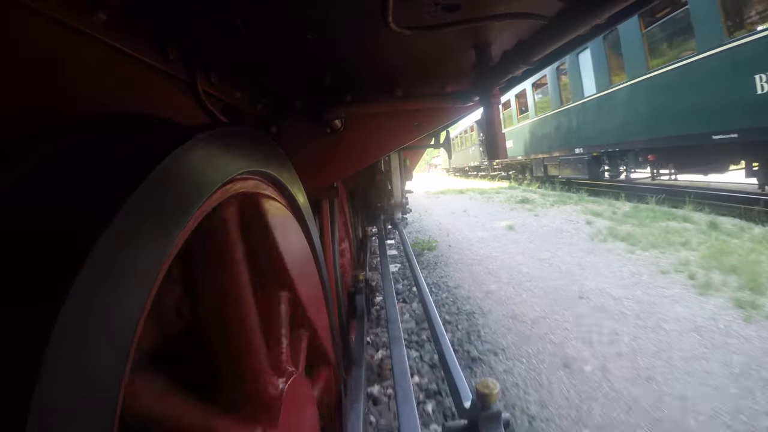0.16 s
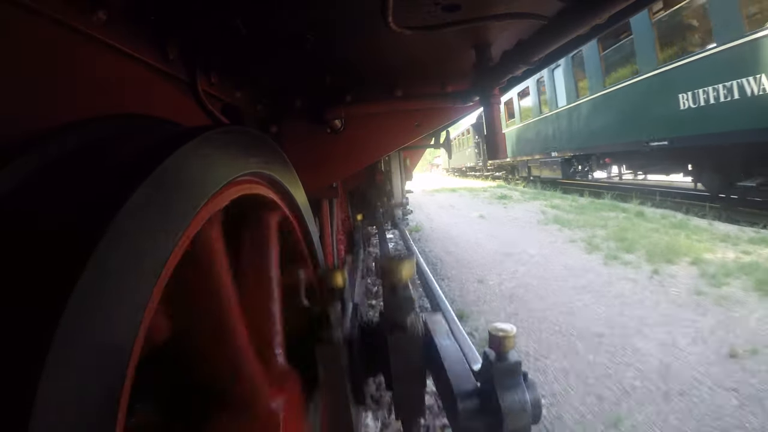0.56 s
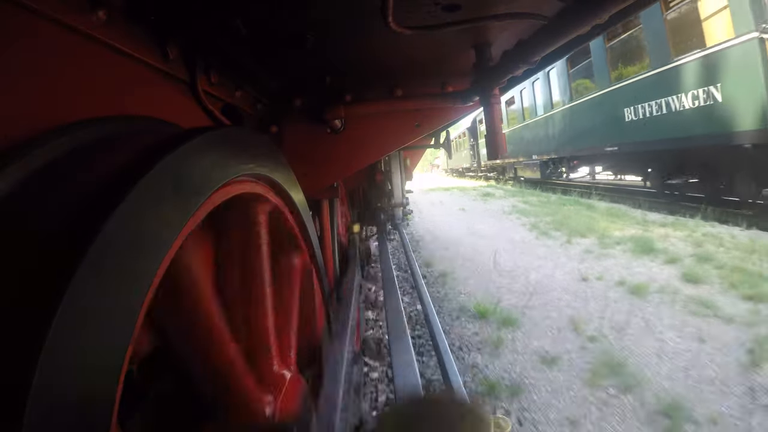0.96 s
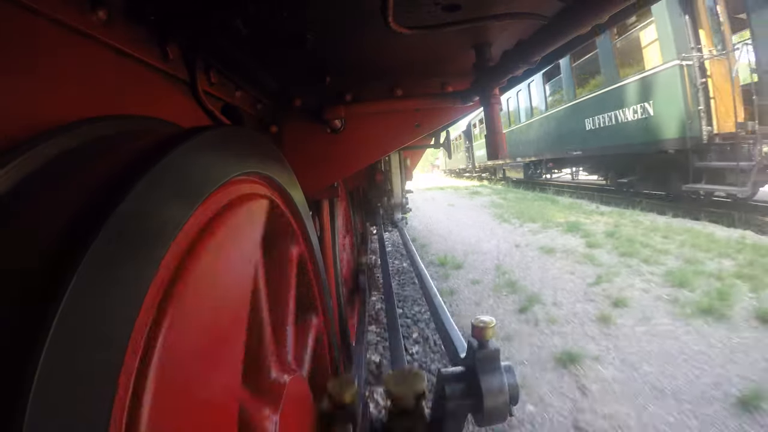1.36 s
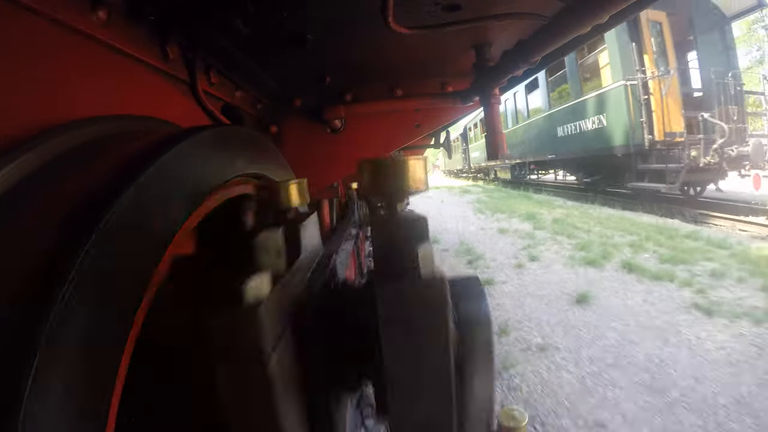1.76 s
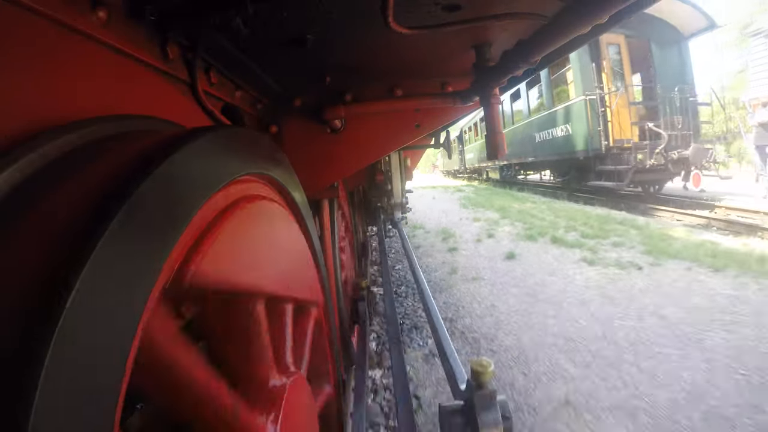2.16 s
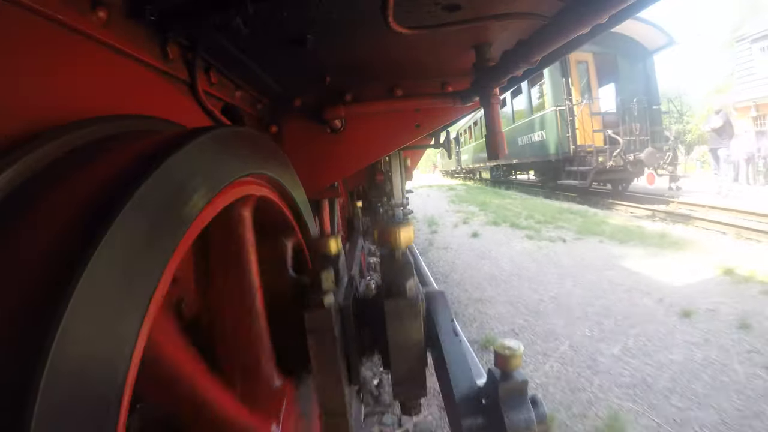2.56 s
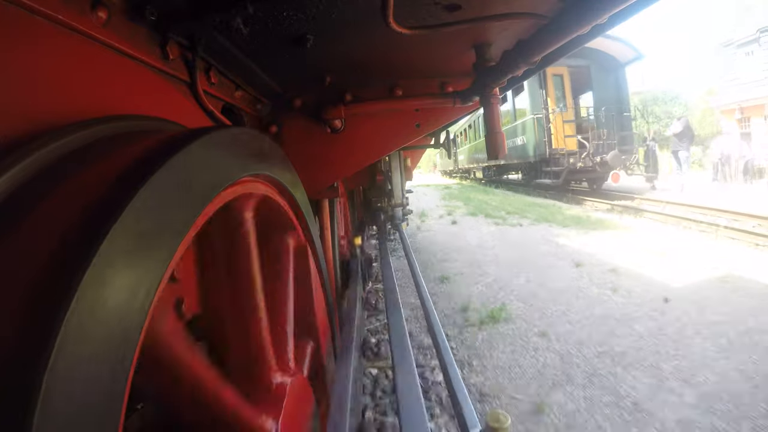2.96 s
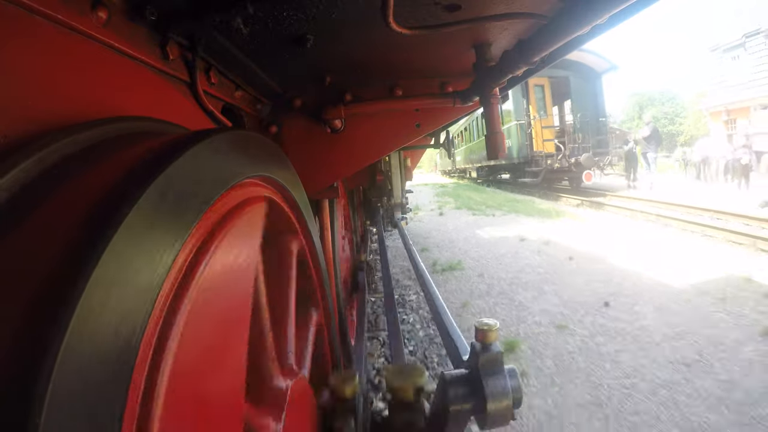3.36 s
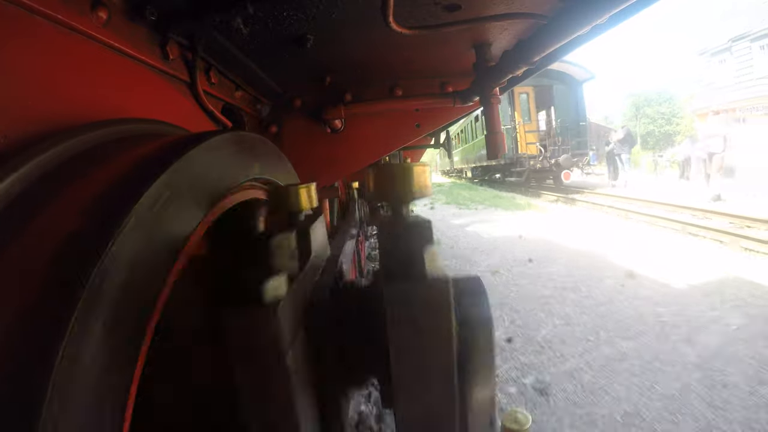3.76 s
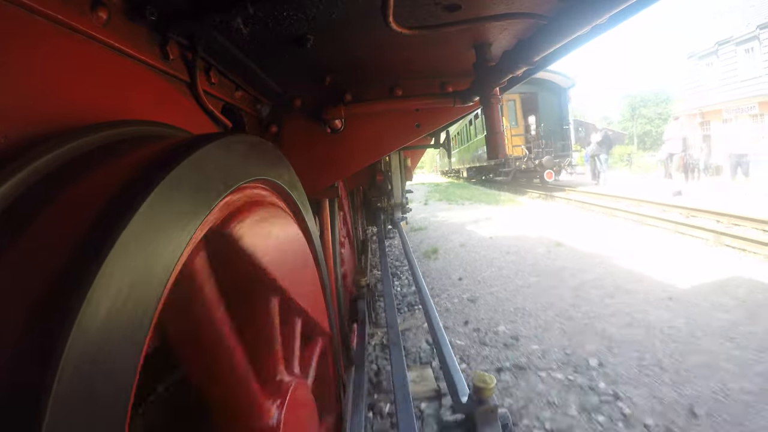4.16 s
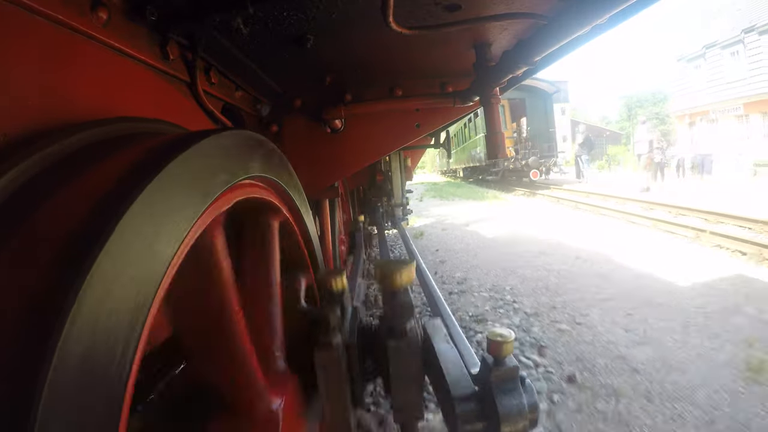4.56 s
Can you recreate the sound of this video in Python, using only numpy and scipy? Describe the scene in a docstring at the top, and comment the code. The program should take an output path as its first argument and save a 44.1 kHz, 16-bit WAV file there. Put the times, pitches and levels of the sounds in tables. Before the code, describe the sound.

Beside a locomotive's driving wheels: low surging frame drone, ringing steel clinks and rattles, then a violent knock, more thuds and brief quiet hisses.

```python
"""In a station, on the frame of a slowly rolling steam locomotive, beside the driving wheels.
Rolling wheels keep frame, plates, panel and cover booming: shaken resonances, noise and wavering tones.
Play in rods and axle boxes clinks, ticks, rattles and knocks: noise bursts ring the modes of the steel.
Steam escapes in three short hisses: gated noise, shaped by a jet spectrum and the leak's resonances."""
import sys
import numpy as np
from scipy import signal
from scipy.fft import rfft, irfft, next_fast_len
from scipy.io import wavfile
from scipy.ndimage import uniform_filter1d, minimum_filter1d, map_coordinates

SR = 44100
rng = np.random.default_rng(int(sys.argv[2]) if len(sys.argv) > 2 else 0)


def wrap_up_sound(samples):
    """Save the sound to the file named by the first command line argument, as 16-bit audio."""
    columns = np.atleast_2d(samples).T
    # keep every value between -1 and 1, then stretch to whole-number steps
    tamed = np.clip(columns, -1, 1)
    steps = np.round(tamed * 32767).astype(np.int16)
    wavfile.write(sys.argv[1], SR, steps)


N = 207975  # samples


def amp(db):
    """Decibels to gain."""
    return 10 ** (np.asarray(db) / 20)


def unit(x):
    """x at rms 1."""
    return x / np.sqrt(np.mean(x ** 2) + 1e-20)


def curves(rows):
    """One value per sample for each column after the time, interpolated linearly."""
    s, *cols = np.transpose(rows)
    return [np.interp(np.arange(N) / SR, s, c) for c in cols]


def wobble(knots_per_s):
    """A smooth random curve through normally distributed knots."""
    knots = rng.standard_normal(int(N * knots_per_s / SR) + 4)
    return map_coordinates(knots, [np.arange(N) * knots_per_s / SR])


def swells(rows):
    """A gain that rises and falls in one arch for each (start s, length s, dB) row."""
    t = np.arange(N) / SR
    return sum(amp(db) * np.sin(np.pi * np.clip((t - start_s) / length_s, 0, 1))
               for start_s, length_s, db in rows)


def filtered(x, response):
    """x times a complex response of frequency."""
    m = next_fast_len(len(x) + SR // 2)
    return irfft(rfft(x, m) * response(np.fft.rfftfreq(m, 1 / SR)), m)[:len(x)]


def resonate(x, modes):
    """x through a body's modes; little passes below the lowest or above the highest."""
    def body(f):
        total = 0
        for k, (hz, width_hz, db) in enumerate(modes):
            damping = 1j * f * width_hz
            total = total + (-1) ** k * amp(db) * damping / (hz * hz - f * f + damping)
        return total

    edges_hz = [modes[0][0] * .72, min(modes[-1][0] * 1.3, .45 * SR)]
    band = signal.butter(2, edges_hz, 'bandpass', fs=SR, output='sos')
    return signal.sosfilt(band, filtered(x, body))


def rush(spectrum):
    """Noise of rms 1 with a (Hz, dB) spectrum."""
    hz, db = np.transpose(spectrum)
    noise = rng.standard_normal(N)
    return unit(filtered(noise, lambda f: amp(np.interp(np.log(f + 1), np.log(hz), db))))


def shaken(modes, even_s):
    """Modes under steady random shaking, at rms 1 over every stretch of even_s."""
    x = resonate(rng.standard_normal(N + SR), modes)[SR:]  # skips the onset
    power = np.abs(uniform_filter1d(x * x, max(int(even_s * SR), 1)))
    return x / np.sqrt(power + 1e-20)


def tone(hz, waver_hz, waver_db):
    """One lightly damped mode near rms 1 that wavers in pitch and strength."""
    phase = 2 * np.pi * np.cumsum(hz + waver_hz * wobble(14)) / SR
    return np.sqrt(2) * amp(waver_db * wobble(12)) * np.sin(phase)


def blow(modes, attack_s, t60_s, tail_db, tail_t60_s, strike=0):
    """A rough contact of peak 1: a strike, a burst of tiny impacts and a weaker chatter ring the modes."""
    t = np.arange(SR // 4) / SR
    decay = amp(-60 * t / t60_s) + amp(tail_db - 60 * t / tail_t60_s)
    envelope = (1 - np.exp(-t / attack_s)) * decay
    force = envelope * rng.standard_normal(len(t)) / np.linalg.norm(envelope)
    force[0] += strike
    x = resonate(force, modes)
    return x / np.abs(x).max()


def add(track, s, x):
    """Mix x into the track from time s."""
    part = track[round(s * SR):][:len(x)]
    part += x[:len(part)]


# Slow surges of the frame's main mode. Each row: time in seconds, level in dB before DRONE_TRIM_DB.
DRONE_SURGES = [(0, -10), (0.22, -23), (0.35, -15), (0.47, -21.5), (0.6, -6.5), (0.75, -23.5),
                (0.95, -13.5), (1.3, -9), (1.75, -17), (1.87, -16), (2.1, -16.5), (2.7, -7.5), (3.1, -24),
                (3.28, -7.5), (3.46, -14), (3.6, -11.0), (4.35, -8.5), (4.72, -13.5)]
DRONE_HZ, DRONE_TRIM_DB = 74.1, -3.5


def drone():
    """The frame swings in its strongest mode, near one pitch, and surges slowly."""
    level_db, = curves(DRONE_SURGES)
    return amp(level_db + DRONE_TRIM_DB) * tone(DRONE_HZ, waver_hz=1.18, waver_db=1.8)


# Rail roughness as roar level. Each row: time in seconds, level in dB (only its deviation from the mean acts).
RAIL_ROUGHNESS = [(0.0, -38.5), (1.22, -40), (1.35, -40), (1.61, -39.5), (1.85, -38.5), (2.01, -35),
                  (2.14, -33), (2.35, -37.5), (3.53, -38), (3.94, -37.5), (4.5, -39), (4.72, -34.5)]


def roughness():
    """How much rougher than average the rail is, in dB."""
    rail_db, = curves(RAIL_ROUGHNESS)
    return rail_db - rail_db.mean()


# Modes of deep chassis, frame, plates and wheel.
# Each row: frequency in Hz, width in Hz, relative level in dB.
BOOM_MODES = [(31.8, 6.2, -24.5), (49.25, 2.8, -8.5), (55.46, 2.1, -5), (61.8, 4.9, -3)]
FRAME_MODES = [(104.7, 7.9, 0), (112.2, 5.4, 1.5), (120.4, 20, -10), (149.1, 8.2, -3.5), (159.7, 10, -9),
               (200.3, 25, -14)]
PLATE_MODES = [(272.9, 15.5, 5.5), (291.7, 9.1, 3), (309.7, 16.5, 2), (318.7, 11.25, 4.5),
               (359.8, 13.5, -5), (400, 3.1, -11.5)]
WHEEL_MODES = [(547, 8.9, 6), (554.6, 55, 0), (612.7, 25, 2), (661.3, 21, -1.5), (735, 38, -10.5),
               (800, 32, -18), (1003, 20, -3.5), (1013, 74, -13), (1127.5, 46, -15.5), (1334, 63, -23),
               (1557, 65, -30.5), (1720, 44, -23.5), (2310, 160, -41), (2510, 28, -31.5)]
# Ground grit. Each row: frequency in Hz, relative spectral level in dB per Hz.
GRIT_SPECTRUM = [(400, -11), (800, 12.5), (1400, 10), (2100, -1), (2700, 4), (3200, 7.5), (3700, 0.5),
                 (4500, 2), (5400, -1), (6200, 5.5), (7000, -3.5), (9000, 1), (11000, -6), (14000, -27)]
# Chassis rumble. Each row: time in seconds, deep boom level in dB, frame level in dB, both before trim.
RUMBLE_LEVELS = [(0, -17, -23.5), (0.35, -9, -13.0), (0.65, -16.5, -19), (0.95, -10.0, -20.5),
                 (1.25, -18, -18.5), (1.6, -9.5, -17.5), (2.1, -11.5, -14.5), (2.4, -10.5, -20.5),
                 (2.65, -14, -23), (2.9, -15.5, -15), (3.3, -14.5, -19.5), (3.55, -11.5, -26.5),
                 (3.8, -16, -18.5), (4.05, -14, -20.5), (4.35, -18.5, -20.5), (4.72, -9.5, -27)]
# Booming plates. Each row: time in seconds, level in dB before trim.
PLATE_LEVELS = [(0, -21.0), (0.9, -20), (1.2, -21), (1.45, -24.5), (1.65, -18.5), (1.85, -20.5),
                (2.25, -16.5), (2.65, -22.5), (3.0, -21.5), (3.45, -18), (4.2, -20.5), (4.4, -17.5),
                (4.72, -21)]
# Plates boom under heavy jolts. Each row: start in seconds, length in seconds, peak level in dB.
PLATE_JOLTS = [(.89, 0.043, -21.5), (2.72, .06, -11), (4.37, 0.039, -12.5), (4.48, 0.055, -12),
               (4.655, 0.084, -8.5)]
BOOM_TRIM_DB, FRAME_TRIM_DB, PLATES_TRIM_DB = -3, -2, -0.5
ROAR_DB, GRIT_DB = -38, -64  # on average rail; grit at mid-scene
ROAR_DB_PER_ROUGH_DB, GRIT_DB_PER_ROUGH_DB = 1, 0.55
GRIT_RISE_DB_PER_S = 1


def rolling():
    """Steel treads shake the chassis, ring the wheels and grind up grit, all the more on rough rail."""
    t = np.arange(N) / SR
    rough_db = roughness()
    boom_db, frame_db = curves(RUMBLE_LEVELS)
    plates_db, = curves(PLATE_LEVELS)
    boom = amp(boom_db + BOOM_TRIM_DB) * shaken(BOOM_MODES, even_s=.2)
    frame = amp(frame_db + FRAME_TRIM_DB) * shaken(FRAME_MODES, even_s=0.12)

    plates_gain = amp(plates_db + PLATES_TRIM_DB + 1.7 * wobble(12))
    plates = np.hypot(plates_gain, swells(PLATE_JOLTS)) * shaken(PLATE_MODES, even_s=0.16)

    roar_db = ROAR_DB + ROAR_DB_PER_ROUGH_DB * rough_db + 1.9 * wobble(22)
    roar = amp(roar_db) * shaken(WHEEL_MODES, even_s=0.9)

    rise_db = GRIT_RISE_DB_PER_S * (t - t.mean())
    grit_db = GRIT_DB + GRIT_DB_PER_ROUGH_DB * rough_db + rise_db + 1.5 * wobble(48)
    grit = amp(grit_db) * rush(GRIT_SPECTRUM)
    return boom + frame + plates + roar + grit


# Panel swells. Each row: start in seconds, length in seconds, peak level in dB.
PANEL_SWELL_ROWS = [(0.025, 0.033, -13.5), (0.365, 0.06, -18.5), (0.457, 0.065, -12.5), (0.651, 0.021, -13),
                    (0.707, 0.14, -17), (0.877, 0.06, -13.5), (1.155, 0.17, -14), (1.434, 0.057, -19.5),
                    (1.755, 0.086, -14), (2.057, 0.095, -17), (2.446, 0.056, -18), (2.524, 0.048, -17.5),
                    (3.024, 0.15, -20), (3.618, 0.073, -16), (3.813, 0.075, -15)]
PANEL_HZ, PANEL_START_DB, PANEL_FADE_DB_PER_S = 180.7, -23.5, 0.98


def panel():
    """A loose panel hums on one note, swells now and then and slowly settles between swells."""
    t = np.arange(N) / SR
    idle = amp(PANEL_START_DB - PANEL_FADE_DB_PER_S * t + 2.5 * wobble(12))
    return np.hypot(idle, swells(PANEL_SWELL_ROWS)) * tone(PANEL_HZ, waver_hz=3.5, waver_db=0.85)


# Cover groans. Each row: start in seconds, length in seconds, peak level in dB.
COVER_GROANS = [(0.252, 0.15, -23), (2.713, 0.12, -24)]
COVER_HZ, GROAN_SAG_HZ_PER_S = 463, 100
COVER_DB, COVER_DB_PER_ROUGH_DB = -40, .8  # level on average rail


def cover():
    """A cover plate sings faintly with the rail and twice groans aloud on a falling note."""
    t = np.arange(N) / SR
    sag_hz = np.zeros(N)
    for start_s, length_s, _ in COVER_GROANS:
        during = (t > start_s) * (t < start_s + length_s)
        sag_hz += GROAN_SAG_HZ_PER_S * (t - start_s - length_s / 2) * during
    idle = amp(COVER_DB + COVER_DB_PER_ROUGH_DB * roughness() + 2.5 * wobble(22))
    return np.hypot(idle, swells(COVER_GROANS)) * tone(COVER_HZ - sag_hz, waver_hz=5, waver_db=2.1)


# Modes of loose pins and brasses. Each row: frequency in Hz, width in Hz, relative level in dB.
SLACK_MODES = [(2440, 300, -5.5), (2680, 69, 1.5), (2710, 43, -13), (3050, 90, -3.5), (3900, 390, -17)]


def chatter(count, level_db, spread_db, t60_s):
    """Loose pins and brasses jingle faintly at random moments."""
    t = np.arange(SR // 8) / SR
    shake = np.zeros(N)
    for when, softness in rng.random((count, 2)):
        burst = amp(-spread_db * softness - 60 * t / t60_s) * (1 - np.exp(-t / .008))
        add(shake, when * (N - 1) / SR, burst)
    return amp(level_db) * unit(resonate(shake * rng.standard_normal(N), SLACK_MODES))


# Modes of rod, brass and joint. Each row: frequency in Hz, width in Hz, relative level in dB.
ROD_BODY_MODES = [(700, 80, 6.5), (1036, 15, 13), (1180, 57, 2.5), (1285, 430, -14.5), (1579, 30, -0.5),
                  (1735, 180, -11.5), (2070, 540, -21.5)]
ROD_RING_MODES = [(2180, 430, -23), (2530, 48, -2), (3080, 160, 7), (3300, 81, 1)]
ROD_TICK_MODES = [(3980, 390, 1), (4320, 230, 3.5), (4770, 300, 4), (5400, 300, -2), (6050, 290, 0),
                  (6420, 170, -5), (7000, 120, -12), (8260, 280, -1), (9900, 400, -22)]


def rod_contact(ring_db, body_db, tick_db):
    """Steel meets steel: a tick at the joint, the ring of the brass and the body of the rod."""
    ring = blow(ROD_RING_MODES, attack_s=0.0014, t60_s=.043, tail_db=-31.5, tail_t60_s=0.18)
    tick = blow(ROD_TICK_MODES, attack_s=.0015, t60_s=.05, tail_db=-25, tail_t60_s=.15)
    body = blow(ROD_BODY_MODES, attack_s=.002, t60_s=.07, tail_db=-18, tail_t60_s=.25, strike=.4)
    return amp(ring_db) * ring + amp(tick_db) * tick + amp(body_db) * body


# Rod bearings take up their play. Each row: start in seconds, ring peak in dB, body peak in dB.
BEARING_CLINKS = [(.221, -38, -39), (0.545, -48.5, -44), (0.915, -46.5, -33), (1.091, -29, -25.5),
                  (1.879, -26, -23), (1.966, -35, -25), (2.029, -35.5, -28.5), (2.207, -40.5, -25.5),
                  (2.224, -37.5, -25), (3.26, -46, -33), (3.278, -43, -29), (3.444, -35.5, -24.5),
                  (4.299, -37, -24.5), (4.377, -36, -18)]
# Dry ticks of the valve gear's pins. Each row: start in seconds, tick peak in dB.
PIN_TICKS = [(0.267, -53), (.318, -56.5), (0.497, -47), (.512, -55.5), (0.782, -56), (.887, -58),
             (1.266, -50), (1.337, -37.5), (1.454, -46), (1.748, -54.5), (2.13, -41.5), (2.143, -44),
             (3.055, -44.5), (3.377, -41.5), (3.837, -36), (4.325, -41.5), (4.382, -40)]
CLINK_EDGE_DB = -26.5  # bright edge re body
TICK_RING_DB, TICK_BODY_DB = -0.5, 6.5  # brass and rod re tick


def rods():
    """Bearings take up their play and clink with a clear ring; pins tick dryly."""
    out = np.zeros(N)
    for s, ring_db, body_db in BEARING_CLINKS:
        add(out, s, rod_contact(ring_db, body_db, body_db + CLINK_EDGE_DB))
    for s, db in PIN_TICKS:
        add(out, s, rod_contact(db + TICK_RING_DB, db + TICK_BODY_DB, db))
    return out


# Dense rattle of slack gear. Each row: start in seconds, length in seconds, peak level in dB.
RATTLE_SPELLS = [(.24, 0.2, -47.5), (2.13, .15, -43.5), (2.965, 0.044, -50), (3.12, .24, -43),
                 (3.37, .11, -37), (4.29, 0.19, -41.5)]
RATTLE_PER_S, RATTLE_SPREAD_DB, RATTLE_EDGE_DB = 260, 4, -21.5  # edge re body


def rattle():
    """Many tiny contacts of uneven size run through the rods."""
    hits = rng.random(N) < RATTLE_PER_S / SR
    contacts = hits * amp(RATTLE_SPREAD_DB * np.clip(rng.standard_normal(N), -2, 2))
    scuff = amp(-60 * np.arange(SR // 20) / SR / 0.028)  # 28 ms t60
    force = signal.fftconvolve(contacts, scuff)[:N] * rng.standard_normal(N)
    body = unit(resonate(force, ROD_BODY_MODES))
    edge = unit(resonate(force, ROD_TICK_MODES))
    return swells(RATTLE_SPELLS) * (body + amp(RATTLE_EDGE_DB) * edge)


# Axle box modes. Each row: frequency in Hz, width in Hz, relative level in dB.
AXLE_BOX_MODES = [(606, 150, -5.5), (1002, 30, 2.5), (1130, 37.7, 5.5), (1207, 55, -3.5), (1720, 110, -32),
                  (2120, 120, -35), (2570, 140, -29), (3050, 120, -33.5)]
# Knocks in the guides. Each row: start in seconds, clank level in dB, thud level in dB, both before trim.
GUIDE_KNOCKS = [(.266, -36, -16), (1.888, -28.5, -12), (1.971, -33.5, -15), (2.663, -30, -35),
                (2.717, -9, 0), (2.75, -27, -10.5), (2.766, -21, -9), (2.778, -36, -19), (2.84, -36.5, -21),
                (2.987, -42, -29), (3.135, -26.5, -14), (3.179, -36, -11), (3.331, -35, -24),
                (3.386, -27.5, -25), (3.42, -35, -9.5), (3.455, -32, -5.5), (3.55, -27, -14),
                (3.628, -34.5, -21), (4.304, -33, -30), (4.33, -27.5, -10.5), (4.384, -22.5, -5),
                (4.422, -28.5, -13), (4.479, -25.5, -2.5), (4.582, -30.5, -18)]
CLANK_TRIM_DB, THUD_TRIM_DB = 3.5, -5
CRACK_DB, CRACK_DB_PER_CLANK_DB = -29.5, 1.6  # crack peak of the hardest knock; softer ones lose it faster


def axle_boxes():
    """Heavy knocks crack and clank in the guides, chatter briefly and thud through the plates."""
    out = np.zeros(N)
    hardest_db = max(clank_db for _, clank_db, _ in GUIDE_KNOCKS)
    for s, clank_db, thud_db in GUIDE_KNOCKS:
        crack_db = CRACK_DB + CRACK_DB_PER_CLANK_DB * (clank_db - hardest_db)
        crack = blow(ROD_TICK_MODES, attack_s=.0005, t60_s=.022, tail_db=-24, tail_t60_s=.12)
        clank = blow(AXLE_BOX_MODES, attack_s=.0015, t60_s=.06, tail_db=-11, tail_t60_s=.24, strike=1.1)
        thud = blow(PLATE_MODES, attack_s=.002, t60_s=.03, tail_db=-25, tail_t60_s=.06, strike=2.5)
        add(out, s, amp(crack_db) * crack)
        add(out, s, amp(clank_db + CLANK_TRIM_DB) * clank)
        add(out, s + .002, amp(thud_db + THUD_TRIM_DB) * thud)
    return out


# Steam jet. Each row: frequency in Hz, relative spectral level in dB per Hz.
STEAM_SPECTRUM = [(500, -42.5), (1000, 17), (1700, -0.5), (2200, 0), (3200, -8.5), (3650, -7.5), (4600, -4),
                  (7500, -14), (9500, -3), (10400, -19), (11500, -26.5), (13800, -19), (15500, -25)]
# Resonances of the leak. Each row: frequency in Hz, width in Hz, relative level in dB.
LEAK_MODES = [(2590, 110, 2), (3136, 100, -6), (4390, 70, -13), (4620, 160, -5), (5200, 90, -7),
              (5830, 150, -4), (6150, 130, -3), (7100, 150, -8.5), (8195, 120, -4.5), (8480, 290, -5),
              (8880, 120, -8), (10300, 110, -13)]
# Steam bursts. Each row: start in seconds, end in seconds, nominal flow level in dB.
STEAM_HISSES = [(2.648, 2.912, -51), (3.507, 3.7, -50), (4.43, 4.677, -49.5)]
OPEN_S, CLOSE_S, FLUTTER_DB = .025, 0.051, 1.5
HISS_ARCH_DB = -0.5  # negative: flow slightly weaker in mid-hiss


def steam():
    """A leak opens for part of the piston's stroke and hisses unsteadily through its narrow gap."""
    t = np.arange(N) / SR
    flow = np.zeros(N)
    for start_s, end_s, db in STEAM_HISSES:
        gate = np.clip((t - start_s) / OPEN_S, 0, 1) * np.clip((end_s - t) / CLOSE_S, 0, 1)
        arch = np.sin(np.pi * (t - start_s) / (end_s - start_s))
        flow += amp(db + HISS_ARCH_DB * (arch + 0.5)) * gate
    jet = amp(2.5 + .8 * wobble(55)) * rush(STEAM_SPECTRUM)
    whistle = amp(1.5 * wobble(45)) * unit(resonate(rng.standard_normal(N), LEAK_MODES))
    return flow * amp(FLUTTER_DB * wobble(40)) * (jet + whistle)


def scene():
    """All the running gear and the steam, summed to one channel."""
    booming = drone() + rolling() + panel() + cover()
    jingle = chatter(count=400, level_db=-65, spread_db=7, t60_s=0.03)
    clatter = jingle + rods() + rattle() + axle_boxes()
    return (booming + clatter + steam())[None]


CEILING, TOP_HZ = .96, 15700  # peak amplitude before the low-pass, low-pass corner


def record(dry, release_db_per_s=60):
    """A limiter ducks the loudest peaks and recovers slowly; the ends fade and a steep low-pass follows."""
    ahead = SR // 200  # 5 ms
    excess_db = 20 * np.log10(np.maximum(np.abs(dry) / CEILING, 1))
    recovery_db = release_db_per_s * np.arange(N) / SR
    duck_db = np.maximum.accumulate(excess_db + recovery_db, axis=-1) - recovery_db
    gain = uniform_filter1d(minimum_filter1d(amp(-duck_db), ahead), ahead)
    soft_ends = signal.windows.tukey(N, 2 * ahead / N)
    low_pass = signal.butter(12, TOP_HZ, fs=SR, output='sos')
    return signal.sosfilt(low_pass, dry * gain * soft_ends)


dry = scene()
out = record(dry)
wrap_up_sound(out)
```